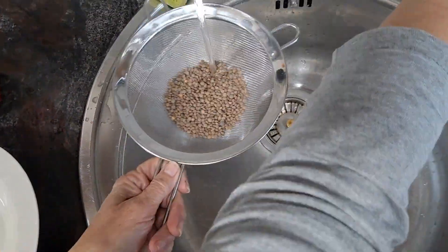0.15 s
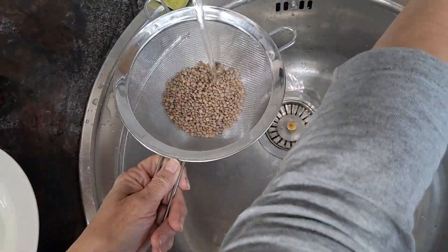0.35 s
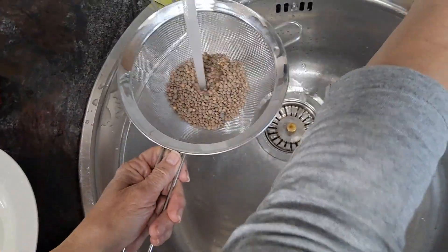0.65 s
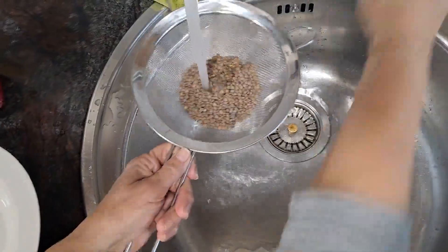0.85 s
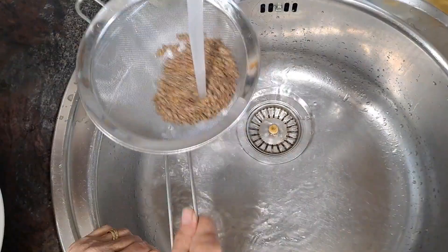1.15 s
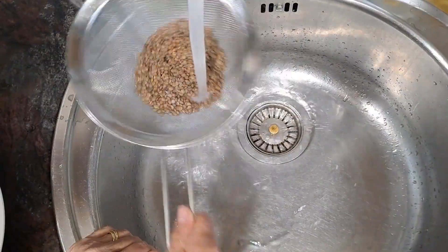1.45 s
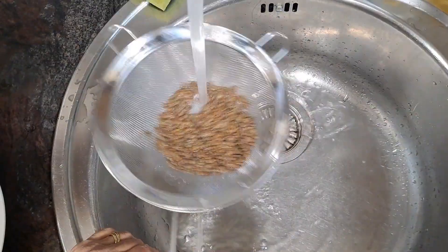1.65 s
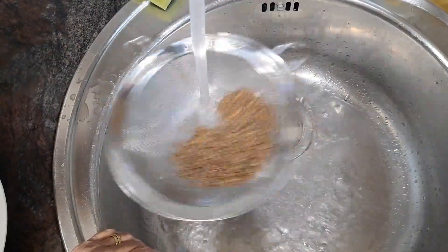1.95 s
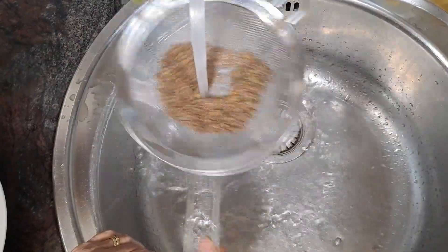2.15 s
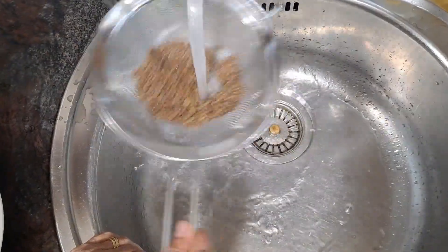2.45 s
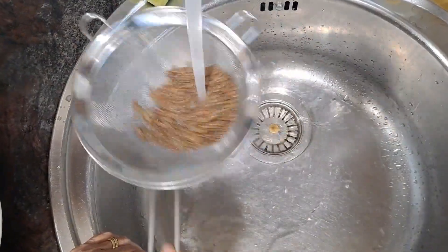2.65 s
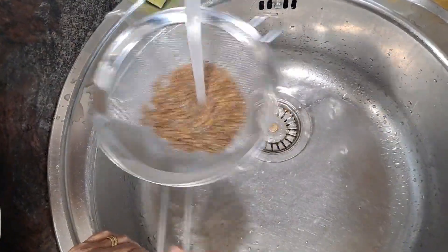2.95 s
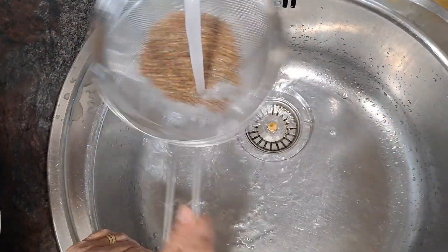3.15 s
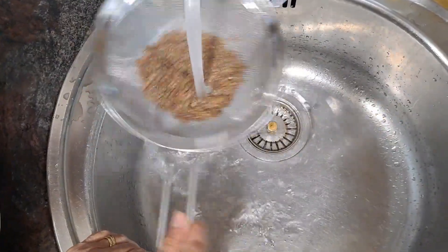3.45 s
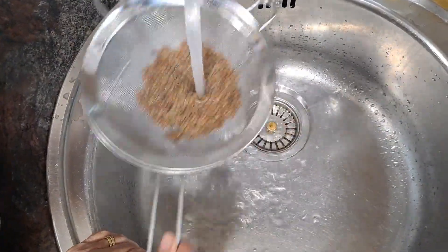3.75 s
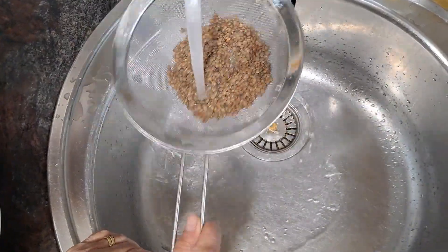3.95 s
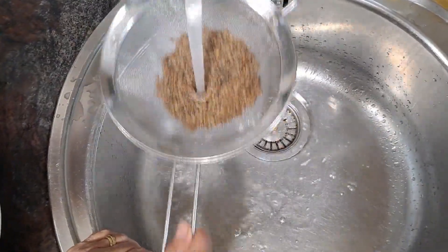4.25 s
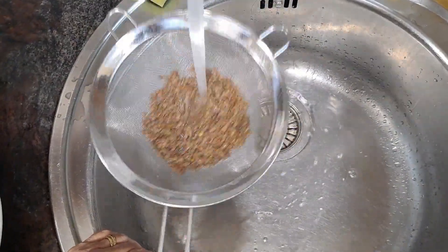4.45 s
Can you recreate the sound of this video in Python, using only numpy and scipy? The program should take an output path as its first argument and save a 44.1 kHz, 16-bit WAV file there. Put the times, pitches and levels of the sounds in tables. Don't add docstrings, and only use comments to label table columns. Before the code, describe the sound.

Water over lentils in a wire strainer, heard from close by. It begins thin, with ticking drops and a soft bump, grows into bright spray, cuts to silence for an instant, then continues as irregular splashing swishes. Crisp droplets lean right; lower bubble plops and dull basin thumps sit nearer the middle or left.

```python
import sys
import numpy as np
from scipy import signal
from scipy.fft import rfft, irfft
from scipy.io import wavfile

SR = 44100
rng = np.random.default_rng(int(sys.argv[2]) if len(sys.argv) > 2 else 0)


def wav_record(signal):
    frames = np.transpose(np.atleast_2d(signal))
    bounded = np.clip(frames, -1, 1)
    quanta = np.round(bounded * 32767).astype(np.int16)
    wavfile.write(sys.argv[1], SR, quanta)


def amplitude_ratio(level_db):
    exponent = np.asarray(level_db, float) / 20
    return 10 ** exponent


N = 202680
SIDES = np.array([[1], [-1]])

# frequency in Hz, left-right likeness from 0 to 1.
LIKENESS = [(60, 0.78), (130, 0.97), (290, 0.96), (640, 0.44), (1410, 0.45), (3100, 0.18), (6820, 0.031),
            (15000, 0.016)]
# frequency in Hz, left over right in dB.
LEAN = [(60, 7), (92, 0), (140, 0.5), (210, 5.5), (330, 4), (500, 3.5), (770, 6), (1170, 5.5), (1790, 5),
        (2740, 0), (4190, 1.5), (6410, -14), (9810, 12.5), (15000, -5)]
# frequency in Hz, level in dB per Hz.
RUMBLE = [(15, -50), (25, -30), (60, -17), (130, -10), (200, -6), (330, -7), (420, -21), (700, -19),
          (1600, -34), (2400, -74)]
# start in seconds, pitch in Hz, level in dB, length in seconds.
BUMP = (.062, 80, -40, .08)
# time in seconds, spray in dB, slosh in dB.
FLOW = [(0.0, -46.5, -48), (0.1, -48.5, -21.5), (0.3, -53.5, -17), (0.4, -49, -15), (0.49, -47.5, -14),
        (0.6, -39.5, -10), (0.72, -42, -1.5), (0.84, -40.5, -5), (0.9, -33, -13.5), (1.12, -35, -12),
        (1.5, -33.5, -10.5), (2.0, -31.5, -9.5), (2.6, -30.5, -9), (3.0, -37, -8), (3.5, -31, -8.5),
        (4.0, -36, -11.5), (4.6, -35, -9)]
# frequency in Hz, level in dB per Hz.
SPRAY = [(400, -48), (520, -20.5), (1050, -16), (1330, -13), (2000, -5.5), (3200, -1.5), (3900, -3.5),
         (4500, 2.5), (6000, -1.5), (7400, 2.5), (8600, -5), (10700, -17), (12500, -9.5), (14600, -4),
         (16000, -10.5)]
# frequency in Hz, width in Hz, level in dB.
MESH = [(4600, 350, -15), (7660, 690, -10)]
# start in seconds, peak in dB, centre in Hz, left over right in dB.
DRIPS = [(0.0074, -25, 7640, -8), (0.035, -36, 6340, -20), (0.0606, -26, 5200, -7), (0.092, -23, 4600, -14),
         (0.107, -24, 7500, -7), (0.12, -30, 2840, 3), (0.126, -16.5, 6250, -7), (0.153, -21, 6530, -8),
         (0.1854, -32, 4900, -4), (0.191, -23, 4860, -5), (0.2, -35.5, 1490, 2), (0.208, -22, 8050, -1),
         (0.237, -29, 6500, -8), (0.269, -27, 7360, -6), (0.301, -30, 4700, -8), (0.3361, -45, 6860, -7),
         (0.358, -34, 6400, -6), (0.37, -24.5, 7300, -8), (0.391, -29, 6140, -8), (0.408, -28, 6560, -8),
         (0.436, -24, 6250, -9), (0.478, -17, 2600, 1), (0.524, -24, 6400, -6), (0.5554, -18.5, 3220, -2),
         (0.559, -23, 5200, -6), (0.58, -20, 6800, -10)]
# start in seconds, peak in dB, centre in Hz.
SPLATS = [(0.6687, -24, 6650), (0.756, -22, 5200), (0.849, -16, 4770), (0.905, -19, 4640),
          (1.079, -14, 7300), (1.171, -13, 6860), (1.1845, -12, 4170), (1.381, -12.5, 7010),
          (1.407, -11, 6250), (1.4513, -12.5, 7060), (1.606, -14, 6700), (1.8178, -7.5, 5880),
          (2.0362, -17, 4900), (2.4596, -15, 7280), (2.858, -16, 6290), (2.963, -23, 5760),
          (2.984, -13.5, 7850), (3.043, -16, 5380), (3.062, -15, 5020), (3.08, -8, 6230),
          (3.245, -11, 4920), (3.89, -16, 7600), (3.93, -15, 7160), (4.033, -17, 4600),
          (4.1582, -11.5, 7040), (4.264, -22, 6900), (4.295, -16, 7100), (4.52, -18, 4430),
          (4.5528, -13, 8070)]
# start in seconds, peak in dB, pitch in Hz.
POPS = [(0.4078, -36, 2430), (0.478, -25, 2670), (0.556, -38, 3200), (0.7568, -17, 2790),
        (0.8378, -21, 3560), (0.8837, -18, 2830), (1.1748, -20, 1980), (1.1842, -11.5, 3370),
        (1.211, -17, 2680), (1.406, -21, 2270), (1.4676, -17.5, 2470), (1.776, -22, 1950),
        (2.0357, -11.5, 2900), (2.082, -6.5, 3300), (2.4014, -17, 2900), (2.9897, -19, 1900),
        (3.6054, -19, 2230), (3.71, -13, 3020), (3.8505, -19.5, 3200), (3.9286, -20, 2540),
        (4.0076, -21, 2700), (4.043, -25, 1880), (4.2316, -26, 1850), (4.4187, -16.5, 2920),
        (4.464, -19.5, 2330)]
# start in seconds, peak in dB.
SPITS = [(0.1531, -27), (0.2044, -21), (0.3252, -35), (0.3361, -30), (0.3531, -28), (0.4025, -34),
         (0.4633, -25), (0.5237, -27), (0.5811, -28), (0.7906, -21), (0.9043, -23), (0.9916, -19),
         (1.049, -15), (1.0779, -19), (1.1742, -27), (1.2111, -33), (1.3384, -23), (1.4027, -20),
         (1.534, -23.5), (1.554, -9), (1.8198, -13), (1.8642, -14), (2.0497, -13), (2.3915, -10),
         (2.6529, -18), (2.9657, -11), (3.052, -31), (3.1088, -16), (3.2605, -14), (3.3712, -22),
         (3.3942, -20), (3.5344, -27), (3.5907, -24), (3.6267, -14), (3.6925, -20), (3.7758, -12),
         (3.9015, -15), (3.929, -16), (4.1096, -14), (4.2657, -14), (4.328, -14), (4.4323, -18),
         (4.5356, -16)]
# peak time in
# seconds, peak in dB, pitch in Hz, left over right in dB.
SNAPS = [(0.037, -31, 6290, -16), (0.0612, -23.5, 5250, -13), (0.0634, -31.0, 6200, -4),
         (0.092, -29.5, 4070, 3), (0.0942, -27.0, 4780, -10), (0.1093, -26, 7710, -7),
         (0.1262, -32, 4900, -7), (0.1283, -30, 6420, -11), (0.155, -31, 5990, -11),
         (0.196, -24, 6460, -15), (0.2088, -27, 7060, -11), (0.239, -33.5, 5000, -8),
         (0.2703, -30, 8140, -9), (0.302, -38, 4650, -11), (0.3375, -35, 6980, -13), (0.3591, -35, 4220, 0),
         (0.3933, -21.5, 6500, -14), (0.3954, -26, 6680, -11), (0.4385, -36, 5940, -14),
         (0.4795, -24.5, 4800, -6), (0.526, -25, 4950, -9), (0.558, -26, 3010, 1),
         (0.5608, -21.5, 4780, -5), (0.581, -22.5, 7240, -11), (0.757, -21.5, 4950, -9),
         (0.8492, -12, 5000, -22), (0.9061, -10, 4780, -8), (1.1844, -14.0, 4390, -4),
         (1.1872, -14, 4440, -6), (1.3846, -19.0, 7060, -6), (1.454, -15.5, 6760, -11),
         (1.8632, -20, 4870, -6), (2.0387, -15.5, 4820, -9), (2.8606, -21, 7450, -12),
         (2.9856, -16.5, 8010, -10), (3.0078, -13, 6030, -6), (3.0426, -17.0, 5560, -11),
         (3.0644, -12.5, 4870, -10), (3.0808, -9, 6550, -8), (3.3956, -18.5, 4780, -9),
         (3.7007, -15, 6760, -8), (3.9312, -19, 6930, -2), (4.0445, -20, 4610, -10),
         (4.1392, -22, 4910, -9), (4.1619, -24, 6200, -6), (4.2976, -15, 6800, -12),
         (4.5211, -20.5, 4610, -5), (4.5362, -17.5, 4570, -15), (4.554, -18.0, 8480, -12),
         (4.5576, -18.5, 6630, -11),
         (1.5543, -14, 14800, -2),
    (4.3291, -16, 14600, -4),
    (2.9665, -21, 14000, -2),
    (4.5, -18, 3020, 1),
    (3.1095, -20, 15000, -2),
]
# frequency in Hz, width in Hz, level in dB.
BASIN = [(50.5, 4.9, -23), (81.5, 12, -11), (111.5, 15.3, -6.5), (121.3, 17, -10.5), (175.3, 20, -4.5),
         (185.7, 22.5, -5.5), (260.7, 12.4, -10.5), (329.6, 27, -5), (351, 14, -23), (487, 54, -16),
         (598.4, 48, -7), (822, 44, -17.5), (916, 29, -14.5), (1362, 67, -4), (1486, 20, -13),
         (1847, 98, 1)]
# start in seconds, length in seconds, level in dB.
POURS = [(0.276, 0.15, -52.5), (0.866, 0.3, -47), (1.192, 0.15, -48), (1.388, 0.15, -46.5),
         (1.603, 0.14, -41.5), (1.781, 0.13, -32.5), (1.955, 0.035, -39), (2.027, 0.16, -41.5),
         (2.326, 0.17, -41), (2.602, 0.25, -43), (2.903, 0.043, -43.5), (2.975, 0.16, -39.5),
         (3.23, 0.24, -40.5), (3.614, 0.1, -46.5), (3.754, 0.092, -37.5), (3.892, 0.094, -47.5),
         (4.043, 0.2, -40), (4.24, 0.22, -42), (4.457, .2, -43)]
# start in seconds, peak in dB.
THUMPS = [(0.295, -36.5), (0.897, -29), (1.036, -35), (1.111, -26), (1.211, -32), (1.404, -28),
          (1.601, -28.5), (1.701, -26.5), (1.798, -30), (1.83, -28), (2.065, -26), (2.342, -27),
          (2.401, -25.5), (2.629, -35), (2.722, -24), (2.996, -34), (3.082, -25.5), (3.265, -35),
          (3.347, -25.5), (3.451, -35), (3.629, -30), (3.732, -27), (3.784, -31), (3.934, -37),
          (4.066, -31.5), (4.156, -22.5), (4.258, -21), (4.327, -18.5), (4.386, -29), (4.462, -30),
          (4.533, -24.5), (4.562, -21.5)]
# start in seconds, peak in dB, centre in Hz.
TICKS = [(0.6036, -28, 7390.0), (0.677, -20, 6500.0), (0.7094, -19, 6200), (0.7947, -21, 7500),
         (0.8136, -27, 4650.0), (0.9926, -12.5, 6300), (1.0456, -21, 6370.0), (1.2117, -15.4, 5000),
         (1.2327, -10.5, 7130.0), (1.27, -14, 4200), (1.311, -19, 4620), (1.424, -10, 7900.0),
         (1.8277, -15.5, 6300), (1.862, -11, 4900), (1.9107, -14, 6100), (2.0488, -11, 5190.0),
         (2.104, -13.3, 4670.0), (2.1711, -16.0, 5360), (2.204, -25, 6400), (2.2624, -19, 4630.0),
         (2.3367, -13, 7400), (2.3916, -13, 6720.0), (2.442, -12.5, 6910.0), (2.4903, -13, 4760),
         (2.498, -13, 4700), (2.6151, -27, 4670), (2.6995, -8, 7300), (2.787, -12, 7100),
         (3.006, -17, 6200), (3.1458, -19, 6570.0), (3.261, -8, 6700), (3.314, -9, 7100),
         (3.3594, -19, 6500.0), (3.368, -32, 5200), (3.3943, -14, 7500), (3.6991, -20, 6740),
         (3.7395, -20, 7750.0), (3.952, -17, 5900), (3.962, -14.5, 7550), (4.043, -15.5, 4590.0),
         (4.077, -15, 7700), (4.1092, -29, 5790.0), (4.1194, -19.1, 6850), (4.2334, -22, 4550),
         (4.329, -19.5, 7580.0), (4.3401, -20.2, 8100), (4.4202, -17, 5800), (4.4399, -18, 5850),
         (4.4677, -23, 6740.0), (4.5342, -21, 4520.0)]
# start in seconds, peak in dB, pitch in Hz.
PLOPS = [(0.6186, -37, 3230.0), (0.802, -30, 1990), (0.868, -26, 3230.0), (0.9029, -29.4, 3230.0),
         (1.0192, -25, 3070), (1.048, -30.3, 3200), (1.357, -24, 2560.0), (1.3804, -24, 2990.0),
         (1.4826, -26.9, 2130.0), (1.5684, -31, 3120.0), (1.8833, -25, 1840), (1.941, -23, 2770),
         (2.047, -21.0, 2320), (2.1102, -23.5, 2520.0), (2.152, -27, 2750), (2.265, -24, 2690.0),
         (2.3576, -24, 2740), (2.392, -28, 2630), (2.4439, -23, 3040), (2.5572, -24.2, 1850),
         (2.6654, -34, 3100), (2.734, -19.5, 1760), (2.9624, -25, 2680), (3.313, -31, 2920),
         (3.4507, -31, 3040.0), (3.6552, -25.6, 3120.0), (3.79, -25, 1970), (3.8983, -27, 1820),
         (3.953, -31, 3230), (4.0583, -30, 3270.0), (4.2834, -26, 2000.0), (4.4728, -28.5, 2300.0),
         (4.5287, -31, 2990.0), (4.5745, -27.3, 2480.0)]
# start in seconds, surge in dB, length in seconds.
JERKS = [(1.187, 7, 0.1), (1.4, 3, 0.14), (1.603, 4.5, 0.12), (1.672, -1, 0.08), (1.802, 2, 0.074),
         (1.947, 3, 0.071), (2.043, 4, 0.18), (2.279, 4.5, 0.097), (2.457, 2.5, 0.077), (2.6, 2.5, 0.084),
         (2.628, 3.5, 0.33), (2.93, 4.5, 0.24), (3.241, 6, 0.16), (3.395, 2.5, 0.096), (3.58, 2, 0.16),
         (3.66, 1.5, 0.16), (3.84, 1, 0.33), (4.027, 5, 0.17), (4.252, 3, 0.11), (4.318, 2, 0.26),
         (4.54, 3.5, 0.23)]
# start in seconds, end in seconds.
DROPOUT = (1.1217, 1.1662)


def rms_one(x):
    return x / np.sqrt(np.mean(x ** 2) + 1e-20)


def at_hz(points, hz):
    table_hz, value = np.transpose(points)
    return np.interp(np.log(hz), np.log(table_hz), value)


def lean(db):
    return amplitude_ratio(db / 2 * SIDES)


def drift(rate_hz):
    r = np.exp(-80 * np.pi * rate_hz / SR)
    noise = rng.standard_normal(N // 40 + 2002)
    slow = signal.lfilter([1], [1, -2 * r, r * r], noise)[2000:]
    return np.interp(np.arange(N) / 40, np.arange(len(slow)), rms_one(slow))


def resonance(x, hz, width):
    r = np.exp(-np.pi * width / SR)
    zeros = np.array([1, 0, -1]) * (1 - r * r) / 2
    poles = [1, -2 * r * np.cos(2 * np.pi * hz / SR), r * r]
    return signal.lfilter(zeros, poles, x + 1e-18)


def resonance_pair(x, hz, width, second_width):
    return resonance(resonance(x, hz, width), hz, second_width)


def stereo(mid, side, hz):
    alike = np.clip(at_hz(LIKENESS, hz), 0, .99)
    both = np.sqrt(1 + alike) * mid + np.sqrt(1 - alike) * side * SIDES
    return both * lean(at_hz(LEAN, hz))


def rumble():
    hz = np.maximum(np.arange(N // 2 + 1) * SR / N, 15)
    mid, side = rfft(rng.standard_normal((2, N))) * amplitude_ratio(at_hz(RUMBLE, hz))
    s, bump_hz, bump_db, length = BUMP
    t = np.maximum(np.arange(N) / SR - s, 0)
    swell = np.sin(np.pi * np.minimum(t / length, 1))
    thud = np.sin(2 * np.pi * bump_hz * (t - .01 * np.exp(-t / .015)))
    return amplitude_ratio(-53) * rms_one(irfft(stereo(mid, side, hz), N)) + amplitude_ratio(bump_db) * swell * thud


def bursts(times, power, decay_s):
    marks = np.full(N, 1e-12)
    np.add.at(marks, np.clip((times * SR).astype(int), 0, N - 1), power)
    fall = np.exp(-1 / (decay_s * SR))
    rise = np.exp(-1 / (0.0007 * SR))
    dying = signal.lfilter([1], [1, -fall], marks)
    return signal.lfilter([1 - rise], [1, -rise], dying)


def spray(spray_db, slosh_db, mist_db):
    drops_per_s, full_db, smooth = 420, -38, 0.87
    draw = rng.random((3000, 4))
    times = np.cumsum(-np.log(1 - draw[:, 0]) / drops_per_s)
    pitch = 1400 * 12 ** draw[:, 1]
    size_db = np.minimum(-3.5 * np.log(1 - draw[:, 2]), 11)
    power = amplitude_ratio(size_db) ** 2 * (times < N / SR)
    spread = 0.2 + 0.4 * draw[:, 3]
    edges = np.geomspace(400, 16400, 22)
    white = rng.standard_normal((2, 2, N))
    gusts = drift(16.5)
    steady = np.clip(smooth * amplitude_ratio(full_db - spray_db), smooth, .85)
    out = 0
    for k, (low, high) in enumerate(zip(edges, edges[1:])):
        hz = np.sqrt(low * high)
        band = signal.butter(2, [low, high], "band", fs=SR, output="sos")
        mid, side = signal.sosfilt(band, white[k % 2])
        nearness = np.exp(-(np.log2(hz / pitch) / spread) ** 2)
        drops = bursts(times, power * nearness, 0.014)
        envelope = np.sqrt(steady + (1 - steady) * drops / drops.mean())
        wet_db = np.clip(np.log2(6200 / hz) * 0.51, 0, 1) * 0.9 * (slosh_db + 11.5)
        fine_db = np.clip(np.log2(hz / 8500) * 3, 0, 1) * 0.38 * (mist_db + 10.0)
        gain = amplitude_ratio(at_hz(SPRAY, hz) + wet_db + fine_db + 0.97 * gusts + 1.24 * drift(14.5))
        out = out + gain * envelope * stereo(mid, side, hz)
    return amplitude_ratio(spray_db + 4.5) * rms_one(out)


def bubbles(spray_db):
    per_s = 260
    born = (rng.random(N) < per_s / SR) * rng.standard_normal(N)
    dealt = rng.integers(0, 24, N)
    out = 0
    for k, hz in enumerate(np.geomspace(700, 4500, 24)):
        ring = resonance_pair(born * (dealt == k), hz, 0.0076 * hz, 0.45 * hz)
        out = out + amplitude_ratio(at_hz(SPRAY, hz)) * ring * lean(at_hz(LEAN, hz)) / np.sqrt(hz)
    return amplitude_ratio(spray_db - 11.5) * rms_one(out)


def jet_ridge(spray_db):
    ridge_hz, width_hz, ridge_db = 6650, 740, -5
    start_s, end_s, fade_db_per_s = 0.37, .75, 22
    follows = 0.71
    t = np.arange(N) / SR
    hiss = resonance_pair(rng.standard_normal((2, N)), ridge_hz, width_hz, 2 * width_hz) * lean(-7)
    before_db = -180 * np.maximum(start_s - t, 0)
    after_db = -fade_db_per_s * np.maximum(t - end_s, 0)
    young = amplitude_ratio(before_db + after_db + 3.8 * drift(26))
    return amplitude_ratio(follows * (spray_db + 40) - 35.5 + ridge_db) * young * rms_one(hiss)


def rattle(spray_db):
    per_s, soaked_s, grows_db_per_s = 900, 4.1, 3.5
    born = rng.random((2, N)) < per_s * amplitude_ratio(4.0 * drift(25)) / SR
    strength = amplitude_ratio(1.7 * np.minimum(rng.exponential(1, (2, N)), 4))
    ticks = born * rng.standard_normal((2, N)) * strength
    dealt = rng.integers(0, 10, (2, N))
    seeds = 0
    for k, hz in enumerate(np.geomspace(2200, 8000, 10)):
        ring = resonance_pair(ticks * (dealt == k), hz, 0.21 * hz, 0.41 * hz)
        seeds = seeds + ring * amplitude_ratio(at_hz(SPRAY, hz)) * lean(at_hz(LEAN, hz)) / np.sqrt(hz)
    mesh = 0
    for hz, width, db in MESH:
        mesh = mesh + amplitude_ratio(db) * rms_one(resonance_pair(ticks, hz, width, 2 * width))
    dry_db = grows_db_per_s * np.maximum(soaked_s - np.arange(N) / SR, 0)
    return mesh * lean(-8) * amplitude_ratio(spray_db + 2.0 - dry_db) + amplitude_ratio(spray_db - 6.0) * rms_one(seeds)


def splat(s, peak_db, hz, lean_db, width, decay_s, crack_db=-6, alike=0.11, rise=0.18, pure=0.2):
    t = np.arange(1600) / SR
    noise = rng.standard_normal((2, 2, 1600))
    noise = noise + alike * noise[:, :1]
    turn = rng.uniform(0, 2 * np.pi, (2, 1)) * (hz > 3600)
    onset = 1 - np.exp(-t / 0.00069)
    burst = noise[0] * (np.exp(-t / decay_s) + 0.18 * np.exp(-t / 0.023)) * onset
    rung = resonance_pair(burst, hz, width * hz, 3.7 * width * hz)
    climbing_hz = hz * (1 - 0.42 * rise + rise * np.minimum(t / 0.0073, 1))
    note = np.sin(2 * np.pi * np.cumsum(climbing_hz) / SR + turn) * np.exp(-t / decay_s) * onset
    crack = resonance(resonance(noise[1] * np.exp(-t / 0.007), 5000, 3500), 4500, 5100)
    sound = 0.49 * rung / np.abs(rung).max() + pure * note
    sound = sound + amplitude_ratio(crack_db) * crack / np.abs(crack).max()
    return round(s * SR), amplitude_ratio(peak_db) * lean(lean_db) * sound


def lay_out(hits):
    out = np.zeros((2, N + 1600))
    for at, sound in hits:
        out[:, at:at + 1600] += sound
    return out[:, :N]


def single_drops():
    hits = []
    for s, db, hz, lean_db in DRIPS:
        hits.append(splat(s, db - 0.5, hz, lean_db, 0.29, 0.0034, crack_db=-7.5, alike=0.25, rise=0.55, pure=0.33))
    for s, db, hz in SPLATS:
        hits.append(splat(s, db - 1.5, hz, -7.5, 0.15, 0.007))
    for s, db, hz in POPS:
        hits.append(splat(s, db - 1.5, hz, 1.5, .09, .003, crack_db=-3, alike=2.5))
    for s, db in SPITS:
        hits.append(splat(s, db + 0.37, 14360, -4.0, 0.16, 0.0018, crack_db=-10))
    return lay_out(hits)


def snaps():
    rise_s, fall_s, climb = 0.00083, 0.00062, 0.12
    out = np.zeros((2, N + 400))
    t = (np.arange(400) - 100) / SR
    shape = np.exp(-np.where(t < 0, (t / rise_s) ** 2, (np.abs(t) / fall_s) ** 0.88))
    for s, db, hz, lean_db in SNAPS:
        turn = rng.uniform(0, 2 * np.pi, (2, 1))
        share = lean(lean_db)
        share = share / np.sqrt(np.mean(share ** 2))
        note = np.cos(2 * np.pi * hz * t * (1 + climb * t / 0.0017) + turn)
        at = round(s * SR) - 100
        out[:, at:at + 400] += amplitude_ratio(db - 0.9) * share * shape * note
    return out[:, :N]


def drumming():
    rise_s, fall_db_per_s, trickle_db = 0.015, 390, -60
    t = np.arange(N) / SR
    sheets = []
    for s, length, db in POURS:
        arriving_db = np.maximum(s + rise_s - t, 0) / rise_s * (db - trickle_db)
        draining_db = fall_db_per_s * np.maximum(t - s - length, 0)
        sheets.append(np.maximum(trickle_db, db - arriving_db - draining_db))
    return np.max(sheets, axis=0)


def basin(drum_db, flow_db, spray_db):
    gobs_per_s = 70
    blows = (rng.random(N) < gobs_per_s / SR) * rng.standard_normal(N)
    heavy = np.zeros(N)
    heavy[[round(s * SR) for s, db in THUMPS]] = amplitude_ratio(np.array(THUMPS)[:, 1])
    soften = signal.butter(2, 260, fs=SR, output="sos")
    heavy = 1.01 * signal.sosfilt(soften, heavy + 1e-18)
    out = 0
    for hz, width, db in BASIN:
        floor_mode = 150 < hz < 230
        mid, side = rng.standard_normal((2, N))
        force = np.array([rms_one(blows) * 0.5 + 1.1 * mid, side])
        ring = resonance_pair(force, hz, width, 2.46 * width)
        level_db = spray_db - 18.0
        if hz < 400:
            follow = .9 if floor_mode else .62 if hz < 150 else .35
            level_db = follow * drum_db + (1 - follow) * (flow_db - 13.5)
        out = out + amplitude_ratio(db + level_db - 3.5) * stereo(*(ring / ring.std()), hz)
        if hz < 400:
            struck = resonance_pair(heavy, hz, 0.57 * width, 5.4 * width)
            struck = struck * SR / (np.pi * 1.8 * width)
            out = out + amplitude_ratio(db + (-1.5 if floor_mode else -14)) * stereo(struck, 0 * struck, hz)
    return out


def small_drops():
    hits = []
    for s, db, hz in TICKS:
        hits.append(splat(s, db - 0.5, hz, -5.5, 0.15, 0.0042, crack_db=-8.0))
    for s, db, hz in PLOPS:
        hits.append(splat(s, db + 3.0, hz, 2.5, 0.14, 0.0017, crack_db=-4, alike=1.3))
    return lay_out(hits)


def surges():
    rise_s, hold_share = 0.031, 0.41
    t = np.arange(N) / SR
    jerks = []
    for s, db, length in JERKS:
        rise = (t - s) / rise_s
        sag = (s + length - t) / ((1 - hold_share) * length)
        jerks.append(db * np.clip(np.minimum(rise, sag), 0, 1))
    return np.max(jerks, axis=0)


def scene():
    s, *columns = np.transpose(FLOW)
    flow_db, slosh_db = [np.interp(np.arange(N) / SR, s, column) for column in columns]
    surge_db = surges()
    aerator_hiss_db = -81
    spray_db = 10 * np.log10(amplitude_ratio(flow_db + surge_db) ** 2 + amplitude_ratio(aerator_hiss_db) ** 2)
    mist_db = -8.5 - 0.62 * (spray_db - spray_db.mean())
    water = spray(spray_db, slosh_db - 0.49 * surge_db, mist_db)
    water = water + bubbles(spray_db) + rattle(spray_db) + jet_ridge(spray_db)
    drops = single_drops() + small_drops() + snaps()
    steel = basin(drumming(), 1.1 * (flow_db + 32.5) - 34.0, spray_db + 0.31 * (slosh_db + 11.5))
    return water + drops + steel + rumble()


def low_pass(x):
    return signal.sosfilt(signal.butter(12, 16970, fs=SR, output="sos"), x)


def record(dry):
    cut, back = DROPOUT
    gate_s = [cut, cut + .0004, cut + .004, cut + .024, cut + .031, back - .0004, back + .0006, back + .01]
    gate_db = np.interp(np.arange(N) / SR, gate_s, [0, -28, -40, -48, -110, -110, -5, 0])
    x = signal.sosfilt(signal.cheby2(18, 60, 16150, fs=SR, output="sos"), dry)
    x[1] = np.roll(x[1], 3)
    return low_pass(x * amplitude_ratio(gate_db))


dry = scene()
out = record(dry)
wav_record(out)
```